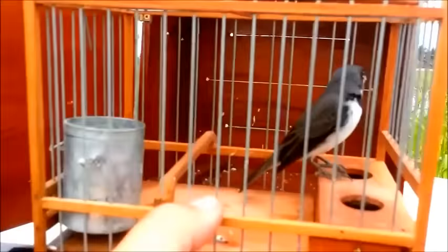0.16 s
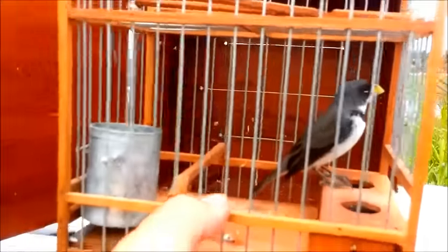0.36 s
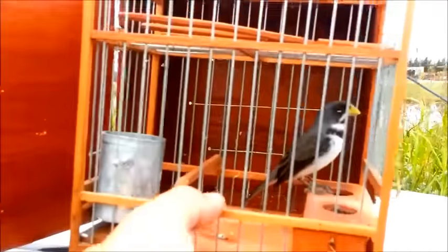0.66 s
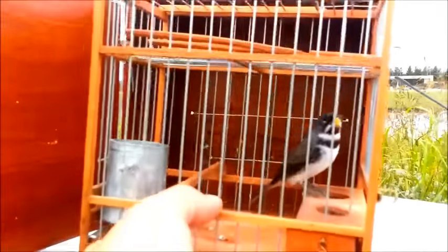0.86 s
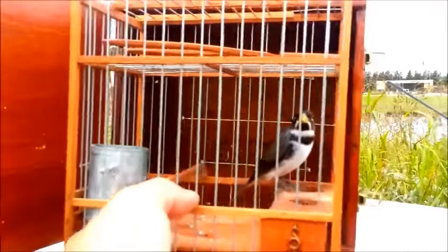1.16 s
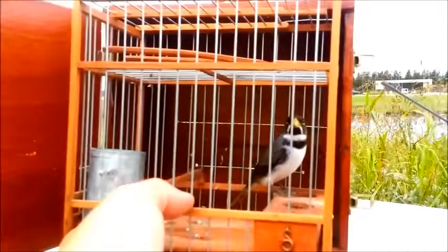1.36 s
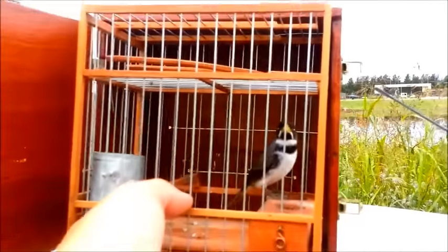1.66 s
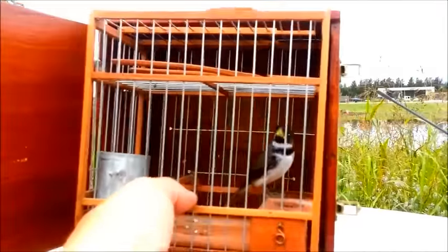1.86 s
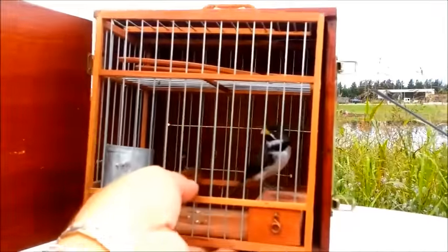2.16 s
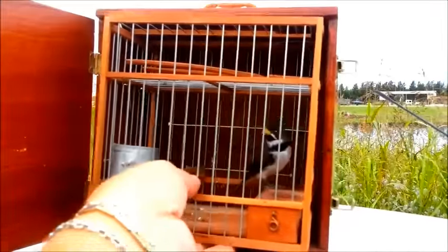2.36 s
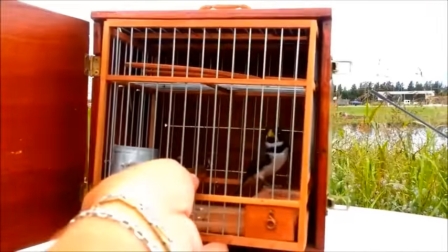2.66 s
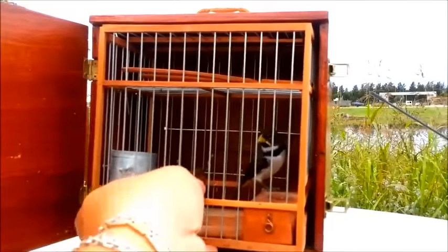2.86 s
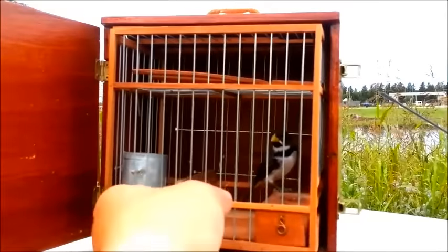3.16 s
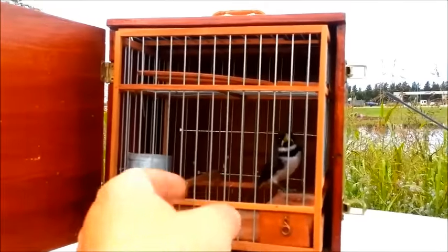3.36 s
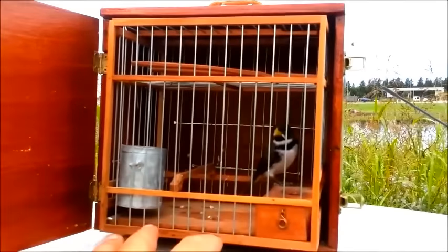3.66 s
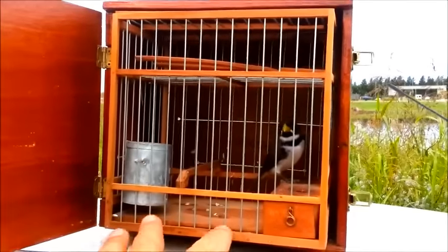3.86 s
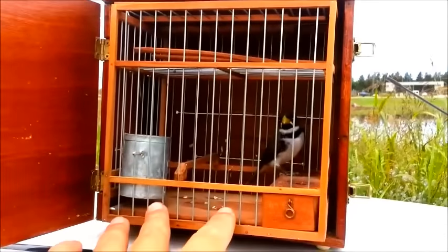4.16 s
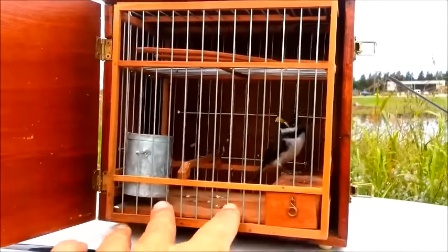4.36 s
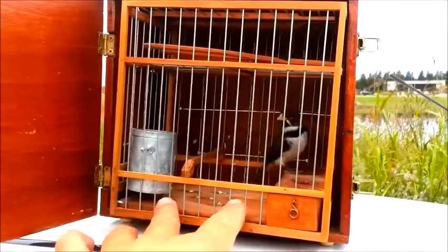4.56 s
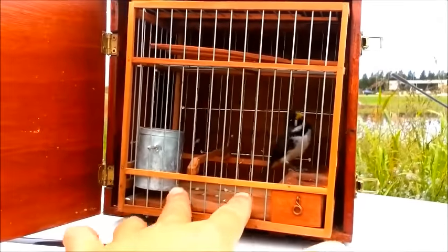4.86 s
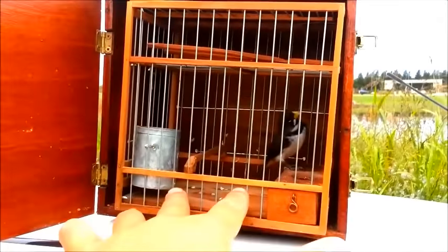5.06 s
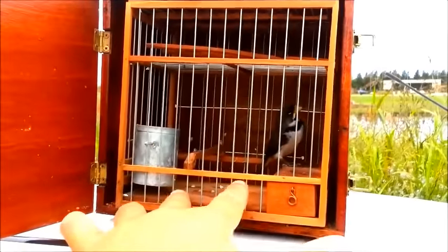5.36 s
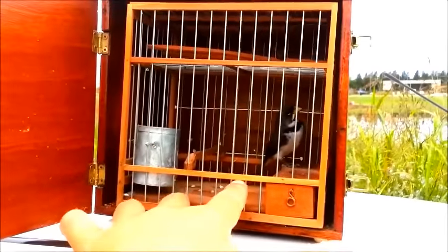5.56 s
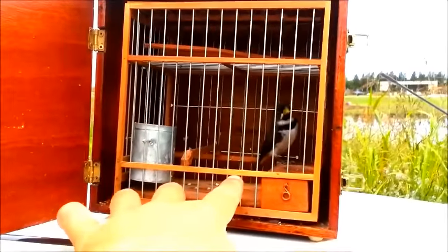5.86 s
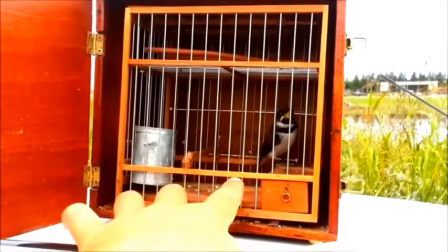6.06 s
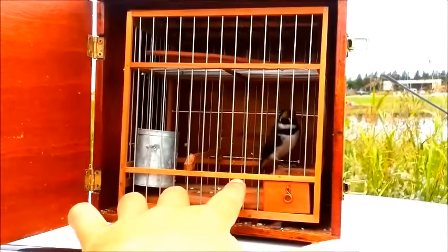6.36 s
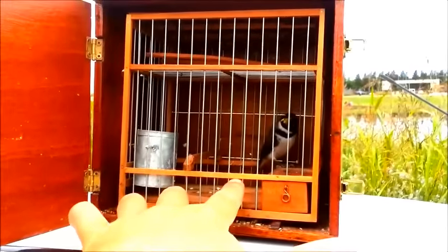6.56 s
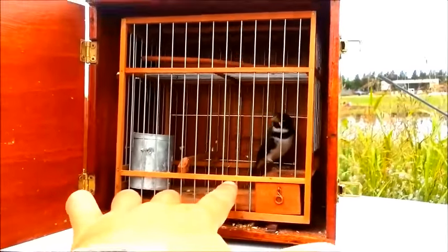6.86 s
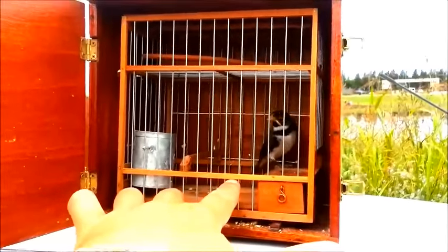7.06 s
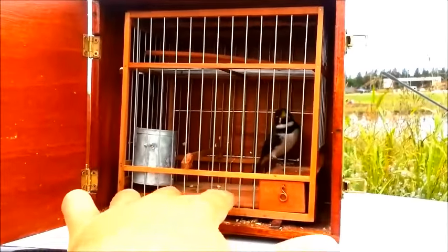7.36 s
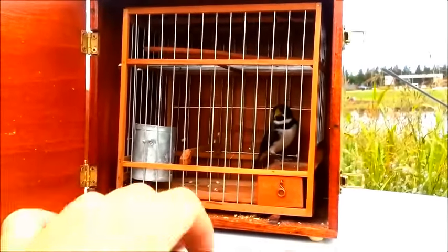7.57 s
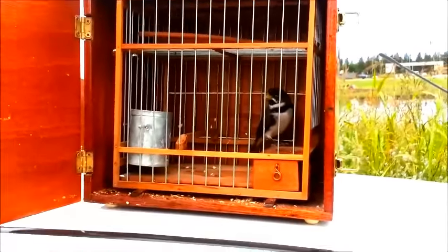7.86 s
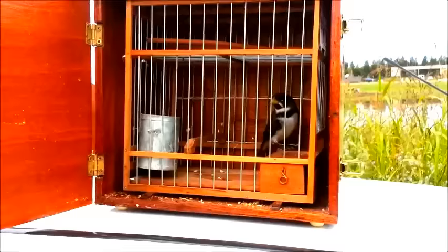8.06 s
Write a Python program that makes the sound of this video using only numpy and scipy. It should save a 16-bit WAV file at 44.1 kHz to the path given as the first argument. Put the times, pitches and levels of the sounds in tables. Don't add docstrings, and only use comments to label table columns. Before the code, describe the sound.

Close handheld pickup, one-sided to the right with mere hiss at left. Rapid cricket pulses and far whistles come first, with a bright click and a woody knock on a cage. Then a caged songbird pipes fast, pure sliding notes with small hoarse edges. Softer fingertip knocks follow in a quieter stretch with far tweets and a brief nasal call. Low microphone bumps precede the bird's final rough, buzzy paired calls. Marsh air stays thin and open.

```python
import sys
import numpy as np
from scipy import signal
from scipy.fft import rfft, irfft, next_fast_len
from scipy.io import wavfile
from scipy.ndimage import uniform_filter1d, minimum_filter1d, map_coordinates

SR = 44100
rng = np.random.default_rng(int(sys.argv[2]) if len(sys.argv) > 2 else 0)


def convert_level_to_amplitude(level_db):
    exponent = np.asarray(level_db, float) / 20
    return 10 ** exponent


def persist_wave(psi):
    counts = np.round(np.clip(psi, -1, 1) * 32767).astype(np.int16)
    wavfile.write(sys.argv[1], SR, np.atleast_2d(counts).T)


N = 362502


def unit(x):
    return x / np.sqrt(np.mean(x ** 2) + 1e-20)


def wobble(rate, count=N):
    points = rng.standard_normal(int(count * rate / SR) + 4)
    return map_coordinates(points, [np.arange(count) * rate / SR])


def filtered(x, response):
    m = next_fast_len(N + 8192)
    return irfft(rfft(x, m) * response(np.fft.rfftfreq(m, 1 / SR)), m)[..., :N]


def noise(points):
    f, db = np.transpose(points)
    shape = lambda hz: convert_level_to_amplitude(np.interp(np.log(hz + 1), np.log(f), db))
    return unit(filtered(rng.standard_normal(N), shape))


def streaky(x, depth_db):
    z = signal.stft(x, nperseg=256)[2]
    field = uniform_filter1d(rng.standard_normal(z.shape), size=24, axis=1)
    return unit(signal.istft(z * convert_level_to_amplitude(depth_db * unit(field)), nperseg=256)[1][:N])


def add(track, s, x):
    part = track[max(round(s * SR), 0):][:len(x)]
    part += x[:len(part)]


def ramp(length_s):
    return np.linspace(0, 1, round(length_s * SR))


def tone(hz, partials, flutter_db, fuzz):
    count = len(hz)
    unsteady_hz = hz * (1 + fuzz * wobble(504.6, count=count))
    phase = 2 * np.pi * np.cumsum(unsteady_hz) / SR + 2 * np.pi * rng.random()
    wave = sum(convert_level_to_amplitude(db) * np.sin(k * phase) * (k * hz < SR / 2) for k, db in partials)
    return np.sqrt(2) * convert_level_to_amplitude(flutter_db * wobble(221, count=count)) * wave


# time in seconds, level in dB.
WIND_LEVEL = [(0.0, -70.5), (.6, -72.5), (1.3, -73.5), (1.9, -72), (2.3, -72), (3.0, -71), (3.6, -72),
              (4.4, -71), (5.1, -68.5), (5.6, -72), (6.2, -73), (6.8, -73.5), (7.3, -71), (8.22, -73)]
# frequency in Hz, level in dB per Hz.
WIND_COLOUR = [(15, -38), (25, -9), (103, -4), (135, -8), (165, -1), (235, -14.5), (334, -14), (436, -23),
               (557, -21), (1930, -25.5), (2940, -29), (5000, -25), (6500, -42), (11000, -120)]


def wind():
    s, db = np.transpose(WIND_LEVEL)
    level_db = np.interp(np.arange(N) / SR, s, db) + 13.5 + 2.68 * wobble(17)
    return convert_level_to_amplitude(level_db) * noise(WIND_COLOUR)


# frequency in Hz, width in Hz, level in dB.
CHORUS = [(4600, 410, -13), (5470, 320, 0), (5856, 540, -0.5), (5970, 77, -0.5)]


def insect_chorus():
    hum = lambda f: sum(convert_level_to_amplitude(db) / (1 + ((f - hz) / (width / 2)) ** 2) for hz, width, db in CHORUS)
    return convert_level_to_amplitude(-60 + 3.5 * wobble(25)) * unit(filtered(rng.standard_normal(N), hum))


# frequency in Hz, level in dB per Hz.
HISS = [(20, -8), (300, -10), (4000, -16), (7000, 3.5), (13000, 1.5), (16000, -0.5)]


def preamp_hiss(gain_db):
    wide = np.clip(1 + gain_db / 10, 0, 1)
    steady = np.sqrt(1 - wide ** 2) * streaky(noise(HISS), depth_db=2.5)
    return convert_level_to_amplitude(-66) * (wide * streaky(noise(HISS), depth_db=8.5) + steady)


# frequency in Hz, level in dB per Hz.
IDLE_HISS = [(20, 0), (150, -2), (1000, -2), (6000, -3), (11000, -1.5), (16000, -5)]


def idle_channel(gain_db):
    return convert_level_to_amplitude(1.18 * gain_db - 70.5) * noise(IDLE_HISS)


# first chirp in seconds, period in seconds, start in Hz, end in Hz, level in dB before the gate.
FAR_CRICKETS = [(.045, .0992, 5720, 5460, -54), (.025, .0985, 6080, 6180, -59),
                (.08, .0974, 4760, 4720, -68)]


def far_crickets():
    out, u = np.zeros(N), ramp(.0357)
    for first, period, start_hz, end_hz, db in FAR_CRICKETS:
        pitch = start_hz + (end_hz - start_hz) * u
        for s in np.arange(first, N / SR, period):
            level = convert_level_to_amplitude(db - 2 + rng.normal(0, 1.5))
            chirp = tone(pitch, [(1, .0026)], flutter_db=3, fuzz=.0079)
            add(out, s - .017, level * np.sin(np.pi * u) ** .93 * chirp)
    return out


def background(gain_db):
    steady = insect_chorus() + far_crickets() + preamp_hiss(gain_db)
    return convert_level_to_amplitude(.82 * gain_db) * wind() + convert_level_to_amplitude(gain_db) * steady


# time in seconds, lag behind the beat in milliseconds, level in dB.
NEAR_CRICKET = [(0, 0.5, -59.5), (.35, 1.5, -52.5), (.6, -4, -58.5), (0.901, 2, -51.5), (1.25, 2, -53.5),
                (1.52, 0.5, -56.5), (1.62, 9.5, -56), (1.95, 19, -59), (2.201, 9.5, -62.5), (3.17, 4, -62),
                (3.27, 6.5, -65.5), (3.75, -1, -64.5), (3.95, -2, -62.5), (4.902, -1, -64.5),
                (6.6, 0, -64.5), (7.05, 0, -60), (7.439, -1.5, -58), (7.55, -0.5, -64.5)]
# time in seconds, extra level in dB.
ACCENTS = [(4.037, 6), (4.716, 6), (4.906, 4.5), (5.198, 4), (5.593, 5.5), (5.79, 4.5), (6.174, 6.5),
           (6.273, 3), (6.466, 7.5)]


def near_cricket():
    out, u, v = np.zeros(N), ramp(.036), ramp(.017)
    period_s = .09717
    beat = np.arange(.054, N / SR - .05, period_s)
    when, lag_ms, level_db = np.transpose(NEAR_CRICKET)
    chirp_s = beat + np.interp(beat, when, lag_ms) / 1e3
    accent_db = sum(db * (abs(beat - s) < period_s / 2) for s, db in ACCENTS)
    chirp_db = np.interp(beat, when, level_db) + accent_db + .88 * rng.standard_normal(len(beat))
    arch_hz = 5990 - 260 * (1 - u) ** 3 - 120 * u ** 4
    strokes = np.sin(3 * np.pi * v) ** 2 * (1 - v)
    for s, db in zip(chirp_s, chirp_db):
        body = tone(arch_hz, [(1, .5), (2, -26.5)], flutter_db=2.5, fuzz=.0012)
        add(out, s - .019, convert_level_to_amplitude(db + 1.5) * np.sin(np.pi * u) ** .67 * body)
        tail = tone(5800 - 400 * v, [(1, .0019)], flutter_db=2, fuzz=.012)
        add(out, s + .013, convert_level_to_amplitude(db + 5) * strokes * tail)
    return out


def bent_notes(notes):
    out = np.zeros(N)
    for s, length, hz, db in notes:
        u = ramp(length)
        pitch = np.polyval(np.polyfit([0, .5, 1], hz, 2), u)
        swell = np.abs(np.sin(np.pi * u)) ** .6
        add(out, s, convert_level_to_amplitude(db - 2) * swell * tone(pitch, [(1, 0)], flutter_db=2.5, fuzz=.005))
    return out


def far_glides(rows, halfway):
    return bent_notes([(s, length, (a, a + halfway * (b - a), b), db) for s, length, a, b, db in rows])


# start in seconds, length in seconds, start in Hz, end in Hz, level in dB.
WHISTLES = [(0.038, 0.045, 3000, 4500, -71), (0.236, 0.13, 4750, 4400, -74), (0.514, 0.16, 5620, 4820, -66),
            (.66, 0.12, 4490, 3270, -73.5), (1.098, 0.048, 4700, 4100, -67),
            (1.499, 0.065, 3696, 3710, -60), (3.55, 0.043, 4000, 4550, -74),
            (4.152, 0.044, 5100, 4600, -81), (5.713, .06, 3900, 2930, -80), (6.965, 0.057, 3960, 4030, -74),
            (7.128, 0.27, 3940, 4600, -81), (7.06, .095, 7800, 7800, -81), (7.131, 0.042, 7950, 6500, -69),
            (7.294, 0.072, 6600, 7560, -69)]


def far_whistles():
    return far_glides(WHISTLES, halfway=.3)


# start in seconds, length in seconds, level in dB.
PEEPS = [(0.082, 0.041, -68), (0.242, 0.04, -59.5), (0.385, 0.049, -62), (0.531, 0.028, -57.5),
         (.648, 0.029, -61), (0.761, 0.026, -62.5), (0.873, 0.026, -59), (0.985, 0.021, -63),
         (1.096, 0.016, -62.5), (1.198, 0.016, -61.5)]
# time in seconds, level in dB.
FLICKS = [(1.9, -71), (1.98, -70), (2.05, -75), (2.204, -61.5), (2.286, -55), (2.364, -54), (2.435, -63),
          (2.505, -64)]


def peep_run():
    out = bent_notes([(s, length, (3020, 3170, 3000), db) for s, length, db in PEEPS])
    u = ramp(.0146)
    arch = np.sin(np.pi * u)
    for s, length, db in PEEPS + [(s + .014, 0, db + 4.5) for s, db in FLICKS]:
        up = tone(2600 + 900 * u, [(1, 0)], flutter_db=1.5, fuzz=.005)
        down = tone(3700 - 1000 * u, [(1, 0)], flutter_db=1.5, fuzz=.005)
        add(out, s - .02, convert_level_to_amplitude(db - 8) * arch * up)
        add(out, s + length - .006, convert_level_to_amplitude(db - 5) * arch * down)
    return out


def ring(modes, t):
    out = np.zeros(len(t))
    for hz, db, t60 in modes:
        fade = convert_level_to_amplitude(db + rng.normal(0, 1.2) - 60 * t / t60)
        out += fade * np.sin(2 * np.pi * hz * rng.normal(1, .012) * t) * rng.choice([-1, 1])
    return out


# time in seconds, then the levels of wood, wire and tick in dB.
KNOCKS = [(0.476, -90, -67, -47), (0.791, -39, -42.5, -44), (1.388, -61, -93, -88), (4.031, -82, -87, -74),
          (4.35, -62, -60.5, -56), (4.543, -60, -72, -100), (4.558, -41, -67, -86), (4.56, -40, -62, -100),
          (4.613, -36.5, -44, -92), (4.618, -62, -38.5, -100), (4.624, -44.5, -50, -74),
          (4.637, -48.5, -57, -100), (4.659, -74, -74, -88), (4.843, -96, -70, -71), (5.511, -70, -71, -92),
          (5.797, -59, -61, -67), (6.997, -61, -70, -79)]
# frequency in Hz, level in dB, seconds to fade by 60 dB.
WOOD = [(278.5, -0.5, 0.13), (363, -12, 0.1), (600, -5, 0.056), (784, -1.5, 0.018), (1060, -27, 0.084)]
# frequency in Hz, level in dB, seconds to fade by 60 dB.
WIRE = [(1552, 4.5, 0.022), (1880, 1, 0.011), (2950, -3.5, 0.029), (3560, 1.5, 0.015), (4400, 3.5, 0.012)]
# frequency in Hz, level in dB, seconds to fade by 60 dB.
LATCH = [(5190, -5.5, 0.015), (7200, 4.5, 0.0047), (11820, -14, 0.028)]


def knocks():
    nail, fingertip, t = np.zeros(N), np.zeros(N), np.arange(round(.15 * SR)) / SR
    for s, wood_db, wire_db, tick_db in KNOCKS:
        crack = convert_level_to_amplitude(wire_db + 12.5 - 60 * t / .044) * uniform_filter1d(rng.standard_normal(len(t)), size=4)
        rattle = convert_level_to_amplitude(wood_db + 7 - 60 * t / .13) * uniform_filter1d(rng.standard_normal(len(t)), size=30)
        tick = convert_level_to_amplitude(tick_db + 14.5) * (1 - np.exp(-t / .00017)) * ring(LATCH, t)
        body = convert_level_to_amplitude(wood_db + 5) * ring(WOOD, t) + convert_level_to_amplitude(wire_db + .5) * ring(WIRE, t)
        add(nail if s < 1 else fingertip, s, body + tick + crack + rattle)
    soft_hz, thin_hz = 1720, 500
    touch = lambda hz: 1.54 / (1 + 1j * hz / soft_hz) * 1j * hz / (thin_hz + 1j * hz)
    return nail + filtered(fingertip, touch)


def contour(rows, gain_db):
    s, hz, db = np.transpose(rows)
    t = np.arange(s[0], s[-1], 1 / SR)
    smooth = lambda v: uniform_filter1d(np.interp(t, s, v), size=130, mode="nearest")
    return t, smooth(hz), convert_level_to_amplitude(smooth(db) + gain_db)


def arched(rows, ease):
    notes = []
    for s, length, start_hz, end_hz, db in rows:
        u = ramp(length)
        pitch = end_hz + (start_hz - end_hz) * (1 - u) ** ease
        arch = np.sin(np.pi * (np.arange(len(u)) + .5) / len(u)) ** .91
        notes.append((s + length * u, pitch, convert_level_to_amplitude(db) * arch))
    return notes


def voice(notes, partials, blurred, flutter_db, fuzz, air_db, air, octave_db):
    out = np.zeros(N)
    for t, pitch, swell in notes:
        edge = signal.windows.tukey(len(t), .15)
        flow = swell.max() * (swell / swell.max()) ** .236
        breath = convert_level_to_amplitude(air_db) * air[round(t[0] * SR):][:len(t)]
        breath = breath + (pitch / 5000) ** 2.8 * tone(pitch, blurred, flutter_db=5, fuzz=.035)
        breath += tone(pitch, [(2, octave_db)], flutter_db=4.5, fuzz=.006)
        ragged = convert_level_to_amplitude(-20) * tone(pitch, [(1, 0)], flutter_db=4.5, fuzz=.04)
        add(out, t[0], edge * swell * (tone(pitch, partials, flutter_db, fuzz) + ragged))
        add(out, t[0], edge * flow * breath)
    return out


# start in seconds, length in seconds, start in Hz, end in Hz, level in dB.
RISES = [
    (1.792, 0.04, 2760, 4000, -53),
    (2.605, 0.033, 3780, 4620, -39.5),
    (2.921, 0.028, 4330, 5350, -39.5),
    (2.94, 0.015, 3980, 5260, -30),
    (3.007, 0.013, 4060, 5370, -37),
]
# start in seconds, length in seconds, start in Hz, end in Hz, level in dB.
FALLS = [
    (2.128, 0.027, 3580, 3270, -50.5),
    (2.238, 0.063, 6730, 6030, -54.5),
]
# time in seconds, pitch in Hz, level in dB.
HELD = [
    [(1.808, 4330, -62), (1.82, 4700, -49.5), (1.834, 4897, -44.5), (1.848, 4790, -48), (1.856, 4900, -56)],
    [(2.281, 5224, -59), (2.287, 4980, -44.5), (2.295, 4830, -48.5), (2.31, 4785, -59)],
    [(3.017, 4660, -45), (3.027, 4980, -34.5), (3.043, 4800, -36), (3.054, 4840, -39)],
]
# time in seconds, pitch in Hz, level in dB.
GLIDES = [
    [(2.124, 4800, -62), (2.148, 4660, -46), (2.18, 4250, -40.5), (2.192, 4190, -42), (2.198, 4199, -55)],
    [(2.296, 5940, -49), (2.306, 5650, -44.5), (2.314, 5480, -57), (2.324, 5380, -45), (2.34, 4890, -36),
     (2.36, 4480, -36), (2.38, 4210, -41.5), (2.396, 4200, -43.5), (2.407, 4214, -50)],
    [(2.537, 6220, -58), (2.551, 5890, -44), (2.567, 5300, -54.5), (2.577, 5150, -41), (2.599, 4995, -32),
     (2.609, 4910, -42)],
    [(2.722, 6260, -52), (2.73, 6100, -44.5), (2.74, 5820, -37), (2.756, 5320, -49), (2.774, 5020, -35.5),
     (2.792, 4750, -32), (2.828, 4537, -37), (2.837, 4470, -33)],
]
# time in seconds, pitch in Hz, level in dB.
LOW = [
    [(2.619, 3478, -53), (2.631, 3487, -43.5), (2.643, 3401, -41), (2.651, 3382, -46.5), (2.66, 3248, -54)],
    [(2.953, 3966, -50), (2.967, 3921, -49), (2.981, 3583, -42), (2.991, 3302, -37), (2.995, 3323, -60),
     (3.001, 3487, -41), (3.005, 3485, -54)],
    [(3.077, 3451, -45), (3.083, 3422, -43), (3.089, 3289, -45), (3.097, 3034, -46), (3.103, 3039, -56)],
]
# time in seconds, pitch in Hz, level in dB.
THIN = [(2.883, 9100, -67), (2.889, 9100, -58.5), (2.907, 9732, -66), (2.915, 9584, -51),
        (2.921, 9360, -57.5), (2.925, 9306, -72)]
# frequency in Hz, level in dB per Hz.
SIBILANCE = [(2500, -24), (4000, -4), (5500, 1.5), (6900, -16), (7700, -6.5), (9000, -30), (12000, -6.5),
             (16000, -23)]


def song():
    notes = [contour(rows, 6) for rows in GLIDES + HELD + LOW + [THIN]]
    notes += arched(RISES, ease=1.42) + arched(FALLS, ease=.66)
    return voice(notes, partials=[(1, 1.8), (2, -47), (3, -35)], blurred=[(1.25, -39.5), (2, -37), (3, -44)],
                 flutter_db=1.3, fuzz=.005, air_db=-30,
                 air=streaky(noise(SIBILANCE), depth_db=6), octave_db=-33)


def rasps(rows):
    out = np.zeros(N)
    for s, length, hz, width_hz, db in rows:
        t = np.arange(round(1.67 * length * SR)) / SR
        f = np.fft.rfftfreq(len(t), 1 / SR)
        resonance = f / (1 + ((f - hz) / width_hz) ** 2) ** 1.24
        puff = unit(irfft(rfft(rng.standard_normal(len(t))) * resonance, len(t)))
        chops = .72 + np.sin(np.pi * 210 * t) ** 2
        add(out, s - .82 * length, convert_level_to_amplitude(db) * np.hanning(len(t)) ** .44 * chops * puff)
    return out


# centre in seconds, length in seconds, pitch in Hz, width in Hz,
# level in dB.
SONG_RASPS = [(2.107, 0.032, 4500, 950, -54.5), (2.565, 0.051, 6900, 440, -49),
              (2.715, 0.017, 6400, 600, -57), (2.75, 0.061, 6200, 500, -45.5), (2.74, .04, 13000, 900, -56),
              (2.56, .035, 13000, 1000, -64), (2.92, 0.034, 8000, 700, -61), (3.066, 0.029, 4400, 352, -41)]


def song_rasps():
    return rasps(SONG_RASPS)


# time in seconds, pitch in Hz, level in dB.
THUMPS = [(2.371, 108, -45.5), (2.599, 90, -47.5), (2.818, 90, -43), (4.548, 90, -38), (5.229, 107, -46),
          (6.99, 83.5, -36), (7.004, 158, -32), (7.012, 95.5, -37.5), (7.68, 92, -37.5), (7.932, 100, -41)]


def thumps():
    out, t = np.zeros(N), np.arange(round(.15 * SR)) / SR
    for s, hz, db in THUMPS:
        u = hz * (t - .02)
        add(out, s - .02, convert_level_to_amplitude(db) * np.cos(2 * np.pi * u) * np.exp(-(2.03 * u) ** 2))
    return out


# start in seconds, length in seconds, start in Hz, end in Hz, level in dB.
PIPES = [(4.672, 0.075, 4070, 4380, -67), (5.561, .06, 2620, 3080, -75), (5.865, 0.067, 2620, 3100, -75),
         (6.015, 0.061, 2620, 2880, -77), (6.17, 0.07, 2660, 3020, -77), (6.355, .07, 2700, 2980, -80)]


def far_pipes():
    return far_glides(PIPES, halfway=.72)


# up note in seconds, its level in dB, down note in seconds, its level in dB.
TWEETS = [(4.83, -70, 4.842, -60), (4.975, -68, 5.012, -61), (5.14, -67.5, 5.18, -59),
          (5.304, -67, 5.338, -58)]


def far_tweets():
    notes = []
    for up_s, up_db, down_s, down_db in TWEETS:
        notes.append((up_s, .027, (6400, 6820, 7050), up_db))
        notes.append((down_s, .027, (5380, 5310, 4500), down_db))
    return bent_notes(notes)


# start in seconds, length in seconds, start in Hz, end in Hz, level in dB.
WADER = [
    (5.134, 0.022, 876, 923, -65),
    (5.152, 0.054, 923, 925, -69.5),
]


def wader():
    out = np.zeros(N)
    partials = [(1, 2.5), (2, -5), (3, -15), (4, -7)]
    for s, length, start_hz, end_hz, db in WADER:
        u = ramp(length)
        call = tone(start_hz + (end_hz - start_hz) * u, partials, flutter_db=2, fuzz=.004)
        add(out, s, convert_level_to_amplitude(db) * np.sin(np.pi * u) ** .69 * call)
    return out


# centre in seconds, length in seconds, pitch in Hz, width in Hz, level in dB.
FAR_RASPS = [
    (7.1, .06, 7900, 300, -78),
    (7.155, 0.037, 7200, 600, -66),
    (7.34, 0.062, 7200, 600, -76),
]


def far_rasps():
    return rasps(FAR_RASPS)


# time in seconds, second harmonic in Hz, level in dB.
STROKES = [
    [(7.573, 3940, -73), (7.577, 4040, -55.5), (7.583, 4365, -45), (7.591, 4694, -62), (7.593, 4830, -50),
     (7.6, 4757, -59)],
    [(7.722, 4070, -70), (7.728, 3890, -46), (7.736, 4120, -48.5), (7.746, 4460, -59), (7.752, 4970, -50),
     (7.757, 4924, -54)],
    [(7.773, 4090, -59), (7.779, 4110, -46), (7.785, 4310, -44.5), (7.796, 4360, -58)],
    [(7.871, 3840, -62), (7.881, 4140, -43), (7.893, 4303, -48), (7.897, 4555, -57), (7.901, 4911, -47),
     (7.908, 4991, -54)],
    [(7.922, 4080, -50), (7.93, 4014, -45), (7.938, 4460, -46), (7.946, 4421, -56)],
    [(8.024, 3670, -47), (8.032, 4140, -49.5), (8.048, 4360, -46), (8.056, 5060, -52), (8.059, 5017, -59)],
    [(8.073, 4037, -49), (8.079, 4056, -45.5), (8.089, 4370, -45), (8.097, 4375, -50)],
    [(8.18, 3680, -51), (8.188, 4200, -50.5), (8.196, 4276, -43.5), (8.204, 4420, -41.5),
     (8.216, 4500, -56.5)],
]
# time in seconds, second harmonic in Hz, level in dB.
SAGS = [
    [(7.617, 4621, -61), (7.623, 4490, -48.5), (7.642, 4480, -55)],
    [(7.644, 4080, -49), (7.652, 4110, -44), (7.66, 3870, -50), (7.666, 3802, -50)],
]
# frequency in Hz, level in dB per Hz.
BREATH = [(1200, -18), (2500, 4), (4000, 6), (6800, -10.5), (8000, -17), (10000, -31), (13000, -8),
          (16000, -17)]


def harsh_calls():
    notes = []
    for rows in STROKES:
        t, pitch, swell = contour(rows, 7.5)
        notes.append((t, pitch * (1 - .123 * np.exp(-(t - t[0]) / .00254)), swell))
    notes += [contour(rows, 7.5) for rows in SAGS]
    return voice(notes, partials=[(.5, -14), (1, -.5), (1.5, -9.5), (2, -23)],
                 blurred=[(.75, -29), (1.25, -14), (2, -27), (2.5, -27)], flutter_db=2.5, fuzz=.011,
                 air_db=-15, air=streaky(noise(BREATH), depth_db=2), octave_db=-30)


# centre in seconds, length in seconds, level in dB.
CALL_RASPS = [(7.608, 0.021, -43.5), (7.672, 0.026, -48), (7.762, 0.021, -47), (7.81, 0.044, -45),
              (7.913, 0.014, -41.5), (7.952, .038, -40), (8.065, 0.027, -44), (8.108, 0.025, -38)]


def call_rasps():
    centre_hz, width_hz, snap_s = 4243, 1420, .0055
    out = rasps([(s, length, centre_hz, width_hz, db - 4.5) for s, length, db in CALL_RASPS])
    u = ramp(snap_s)
    partials = [(.5, -22), (1, 0), (1.5, -13), (2, -24)]
    for s, length, db in CALL_RASPS:
        for start in np.arange(s - .54 * length, s + .35 * length, 1.1 * snap_s):
            pitch = centre_hz * rng.normal(1, .07) * (1 + .26 * (u - .5))
            level = convert_level_to_amplitude(db + .5 + rng.normal(0, 1.5))
            add(out, start, level * np.sin(np.pi * u) * tone(pitch, partials, flutter_db=2.5, fuzz=.02))
    return out


def box(x):
    t = np.arange(round(.12 * SR)) / SR
    tail = rng.standard_normal(len(t)) * convert_level_to_amplitude(-60 * t / .085) * (t > .0015)
    return signal.fftconvolve(x, tail / np.linalg.norm(tail))[:N]


# incoming level in dB, gain in dB.
GATE = [(-67, -12), (-59.5, -7.5), (-46.5, -0.5), (-36, 5)]


def gate_db(x):
    power = np.abs(uniform_filter1d(filtered(x, lambda hz: hz / (hz + 500)) ** 2, size=700))
    held = -minimum_filter1d(-power, size=900, origin=300)
    return uniform_filter1d(np.interp(10 * np.log10(held + 1e-12), *np.transpose(GATE)), size=300)


def scene():
    bird = song() + song_rasps() + harsh_calls() + call_rasps()
    far = far_whistles() + peep_run() + far_pipes() + far_tweets() + wader() + far_rasps()
    cage = bird + convert_level_to_amplitude(-13) * box(bird + 1.5 * far) + knocks() + thumps()
    closed_db = GATE[0][1]
    cricket_lift = convert_level_to_amplitude(.7 * (gate_db(cage) - closed_db))
    near = cage + far + cricket_lift * near_cricket()
    gain_db = gate_db(near)
    return np.array([idle_channel(gain_db), near + background(gain_db)])


# frequency in Hz, readiness in standard deviations.
DROPOUT = [(3000, -4.5), (6500, -2.6), (8500, -1.9), (13500, -1.6), (14300, -1.1), (14800, .4)]


def treble_dropouts(x):
    hz, _, z = signal.stft(x, SR, nperseg=512)
    patches = uniform_filter1d(rng.standard_normal(z.shape[1:]), size=8, axis=0)
    chance = unit(uniform_filter1d(patches, size=14, axis=1))
    right = np.abs(z[1])
    top = right.max(axis=0) + 1e-6
    ready = np.interp(hz, *np.transpose(DROPOUT))[:, None]
    loudness = .035 * (20 * np.log10(top) + 65)
    drop = 1 / (1 + np.exp(-6 * (chance + ready + loudness)))
    weak = (right < convert_level_to_amplitude(-30) * top) | (hz > 6500)[:, None]
    return signal.istft(z * convert_level_to_amplitude(-32 * drop * weak), SR, nperseg=512)[1][:, :N]


def roll_off(x):
    return signal.sosfilt(signal.butter(12, 15770, fs=SR, output="sos"), x)


def record(dry):
    coloured = filtered(dry, lambda hz: (hz < 14780) * hz ** 2 / (hz ** 2 + 45 ** 2)) - .00015
    mix = treble_dropouts(coloured)
    return roll_off(mix)


dry = scene()
out = record(dry)
persist_wave(out)
```